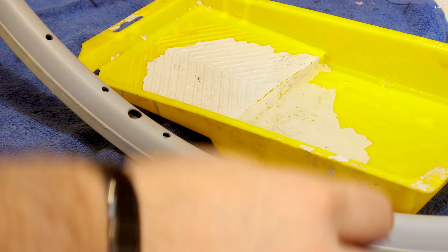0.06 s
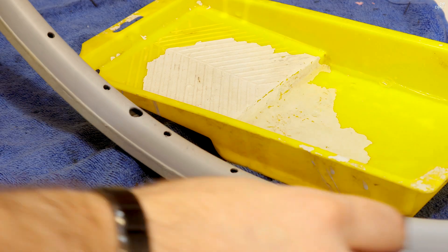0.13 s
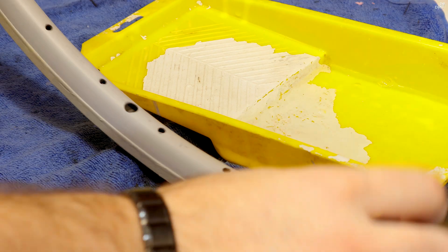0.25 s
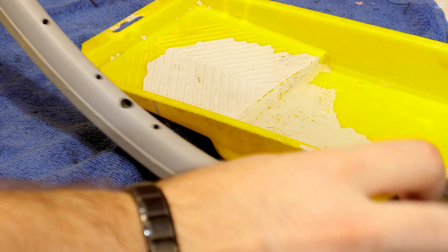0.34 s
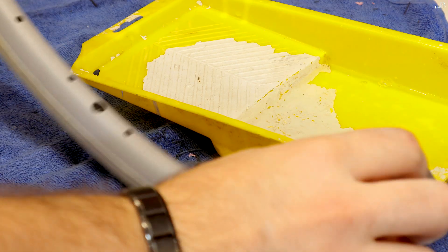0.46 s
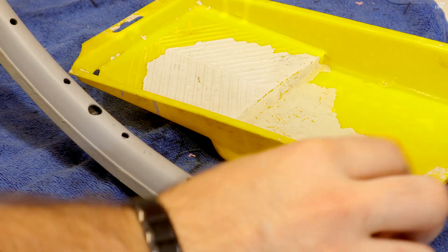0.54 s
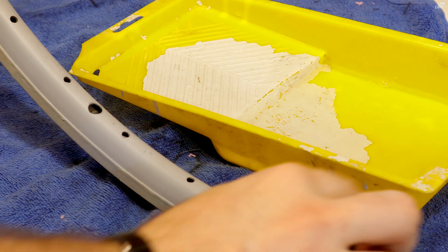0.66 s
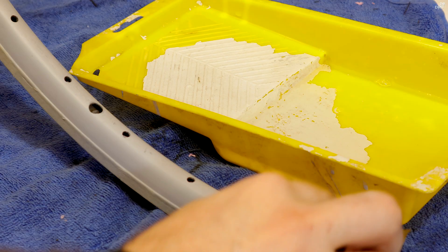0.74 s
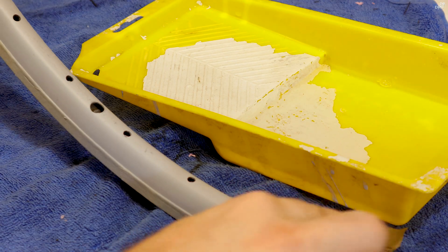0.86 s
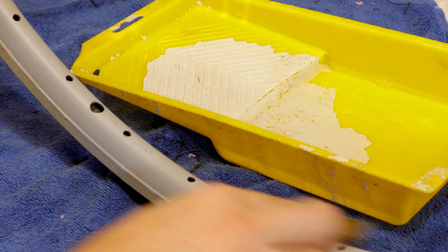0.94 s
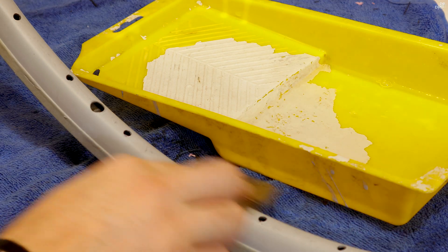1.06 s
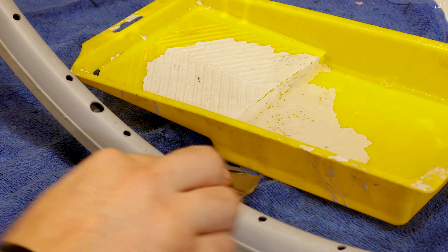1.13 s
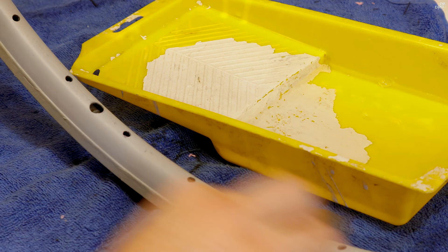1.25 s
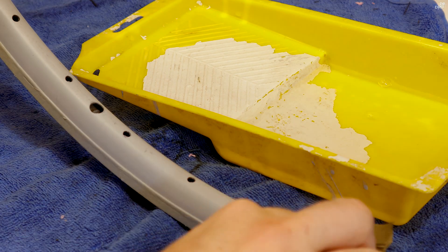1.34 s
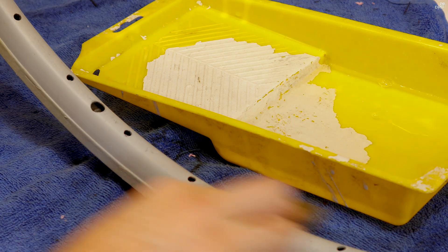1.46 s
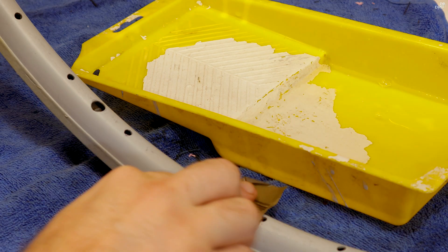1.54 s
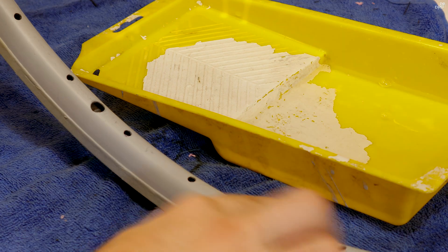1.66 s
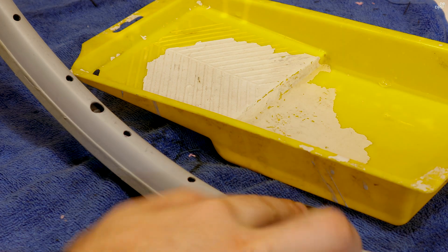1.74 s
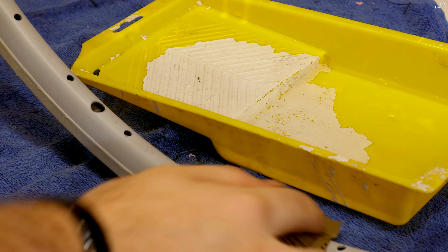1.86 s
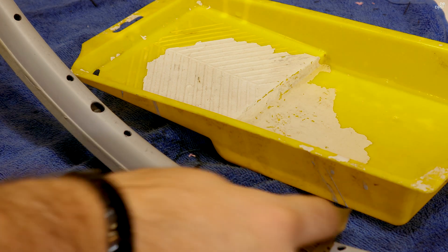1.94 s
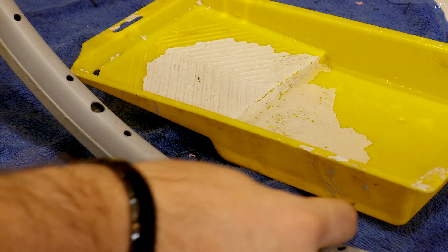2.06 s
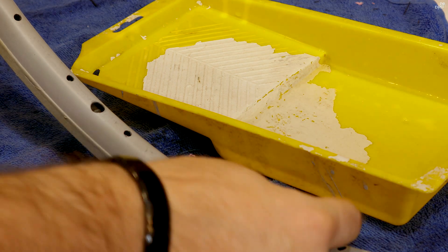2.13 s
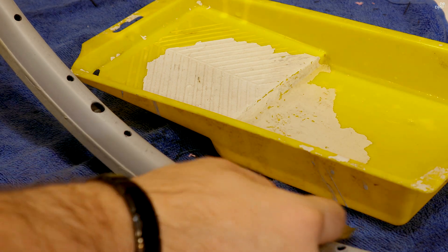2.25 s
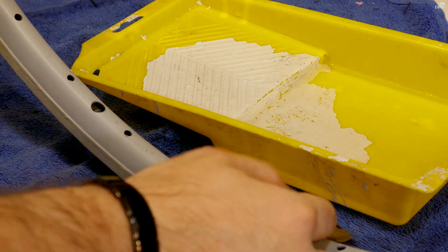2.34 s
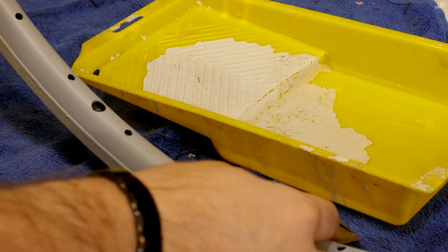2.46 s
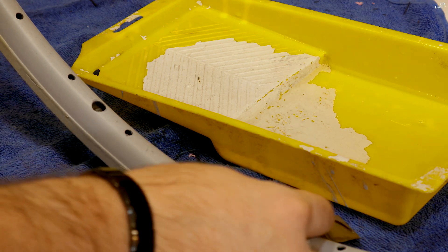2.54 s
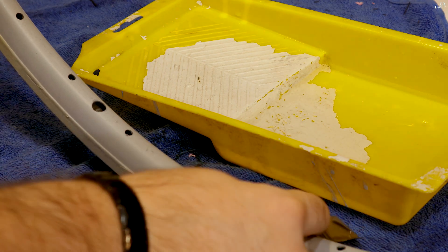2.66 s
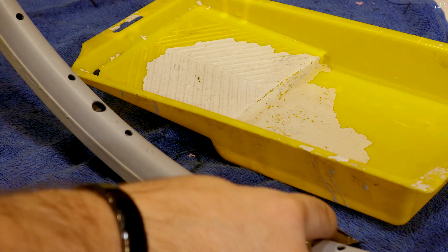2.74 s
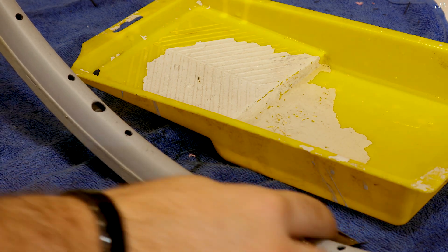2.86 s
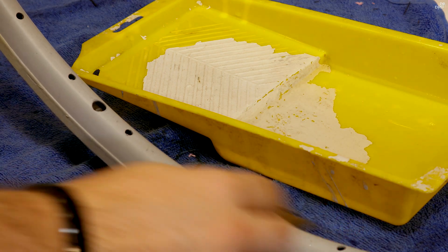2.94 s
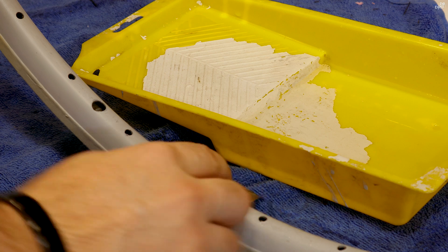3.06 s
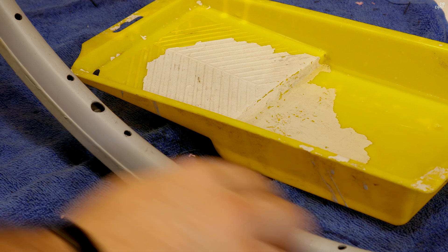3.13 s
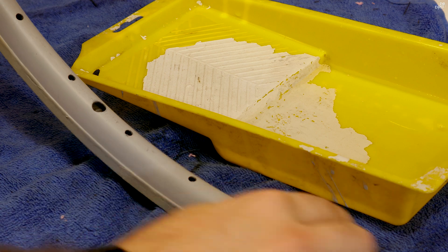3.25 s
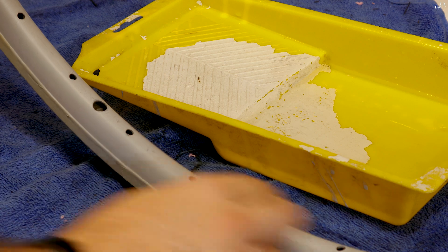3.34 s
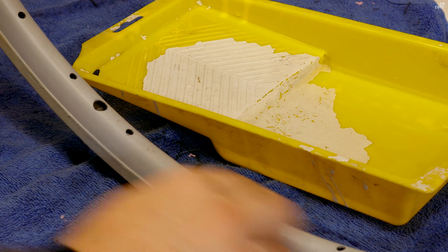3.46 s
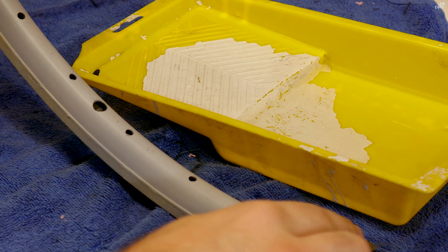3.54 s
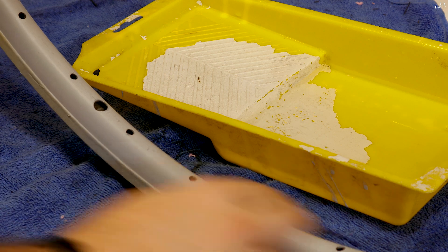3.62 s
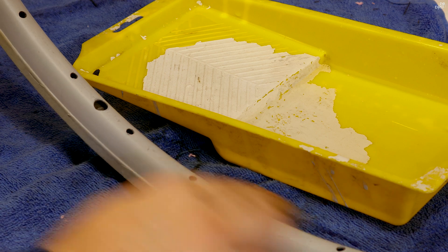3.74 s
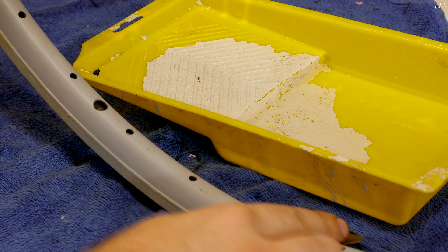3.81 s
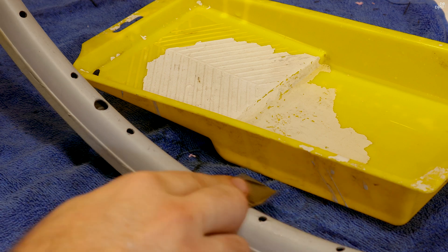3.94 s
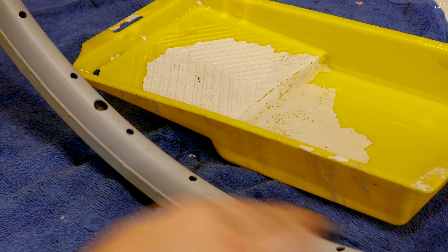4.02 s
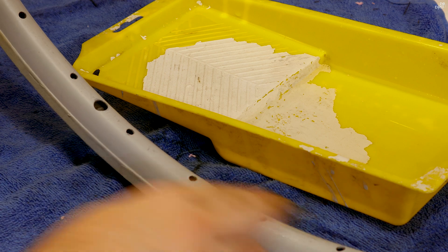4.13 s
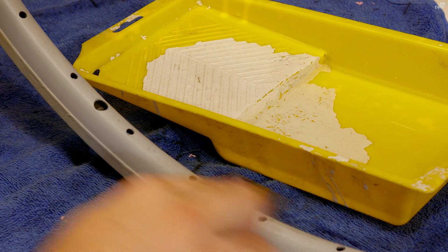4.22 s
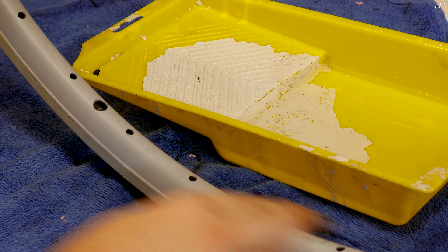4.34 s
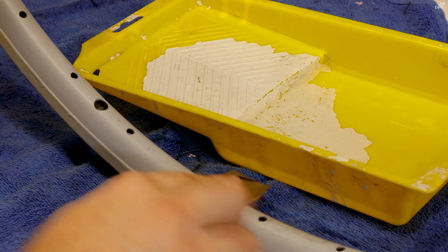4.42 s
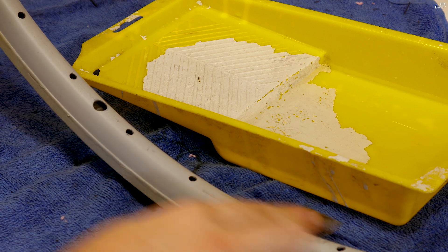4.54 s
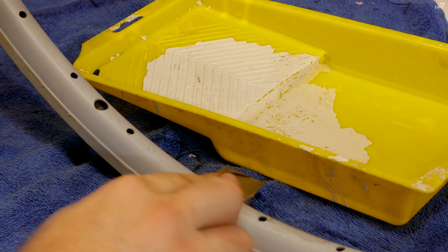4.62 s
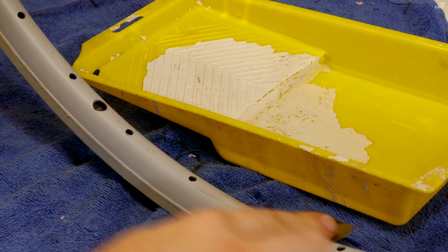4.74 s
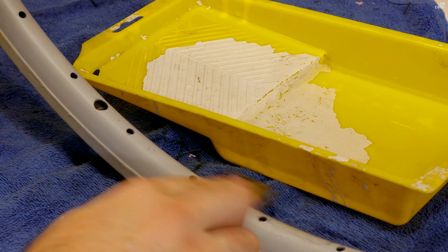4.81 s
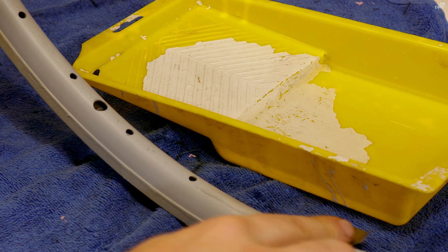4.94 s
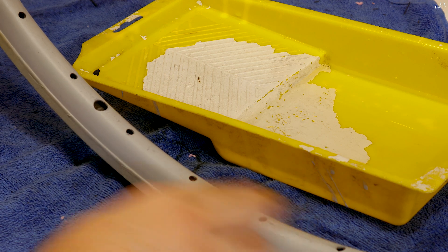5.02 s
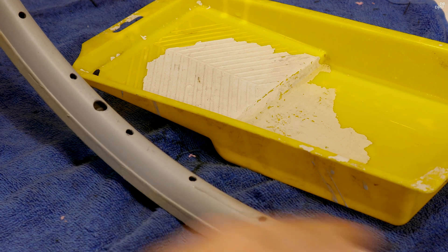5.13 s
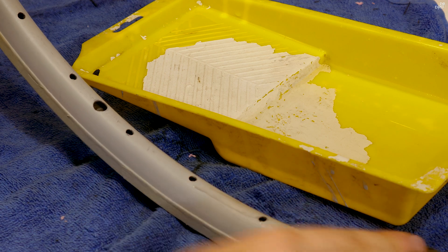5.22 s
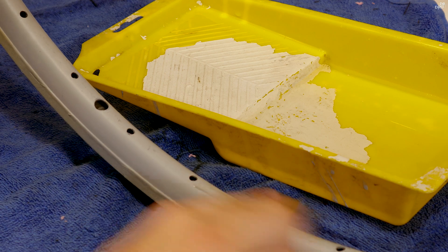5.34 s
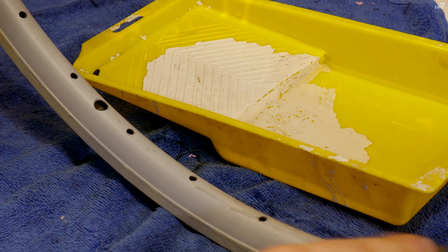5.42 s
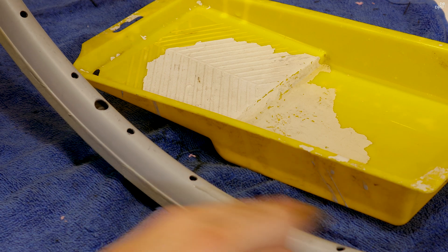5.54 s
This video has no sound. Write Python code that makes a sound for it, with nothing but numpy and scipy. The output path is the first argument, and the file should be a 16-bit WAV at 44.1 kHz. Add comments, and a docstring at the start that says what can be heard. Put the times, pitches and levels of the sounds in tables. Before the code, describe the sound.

In a quiet room, a low handling rumble comes first. Then wet sandpaper rubs a painted metal rim by hand in scattered, uneven strokes, a bright gritty hiss with small snags and faint squeaks. About halfway through it turns into fast, even back-and-forth scrubbing, the metal ringing faintly beneath. Dull bumps knock the close microphone, and it rumbles in time with the harder strokes.

```python
"""A low rumble opens the scene in a quiet room as a working arm shifts and shakes the microphone.
Then wet abrasive paper rubs a painted metal rim lying on a towel: scattered strokes, then, from about
3 s, a fast back-and-forth. Grit scratches the paint in a dense hiss and sets the rim ringing faintly;
now and then the paper snags or squeaks. Dull bumps knock the microphone's housing, and in the
vigorous scrubbing every other stroke makes it rumble."""
import sys
import numpy as np
from scipy import signal
from scipy.fft import rfft, irfft, next_fast_len
from scipy.io import wavfile
from scipy.ndimage import uniform_filter1d

SR = 44100
rng = np.random.default_rng(int(sys.argv[2]) if len(sys.argv) > 2 else 0)


def file_out(sig):
    """Save sig as 16-bit WAV at sys.argv[1]."""
    # one column per channel
    cols = np.atleast_2d(sig).T
    # limit, then scale
    lim = np.clip(cols, -1, 1)
    pcm = np.round(lim * 32767).astype(np.int16)
    wavfile.write(sys.argv[1], SR, pcm)


N = 245891
TIME = np.arange(N) / SR
HZ = np.maximum(np.fft.rfftfreq(next_fast_len(N + SR // 4, True), 1 / SR), 1)
FFT_SIZE = 2 * len(HZ) - 2
USUAL_PRESSURE_DB = -46


def from_db(db):
    """Decibels to gain."""
    return 10 ** (np.asarray(db) / 20)


def unit_rms(x):
    """Scale to an rms of 1."""
    return x / np.sqrt(np.mean(x ** 2) + 1e-20)


def eq_curve(points):
    """Gain at every frequency from a few (Hz, dB) points."""
    hz, db = np.transpose(points)
    return from_db(np.interp(np.log(HZ), np.log(hz), db))


def filtered(x, response):
    """Pass x through a frequency response."""
    return irfft(rfft(x, FFT_SIZE) * response)[:N]


def noise(response):
    """Coloured noise with an rms of 1."""
    return unit_rms(filtered(rng.standard_normal(N), response))


def decay(t60):
    """Ages and gains of a hard attack that falls 60 dB in t60 seconds."""
    age = np.arange(int(1.2 * t60 * SR) + 2) / SR
    return age, from_db(-60 * age / t60)


def place(track, time, sound):
    """Lay a short sound into a track at a time in seconds."""
    part = track[max(int(time * SR), 0):][:len(sound)]
    part += sound[:len(part)]


# Shifts of the arm that shake the microphone: (start [s], end [s], level [dB])
ARM_SHIFTS = [(-.06, 0.291, -57), (0.271, 0.643, -61), (0.764, 0.982, -56.5), (1.087, 1.313, -52.5),
              (1.228, 1.482, -53.5), (1.594, 1.678, -49.5), (1.713, 1.82, -51), (1.895, 2.023, -56),
              (2.126, 2.228, -57), (2.244, 2.429, -65.5), (2.571, 2.946, -63.5), (3.07, 3.191, -57.5),
              (3.189, 3.253, -52), (3.308, 3.4, -61.5), (3.45, 3.561, -57), (3.559, 3.732, -61.5),
              (3.773, 3.884, -53), (3.857, 3.947, -47), (4.093, 4.205, -48.5)]


def arm_shake(tremble_db=-71.5, roundness=0.555, push_db=-44.5, swell_db=13, swell_s=0.1208,
              attack_s=0.023, fall_db_per_s=394):
    """Rumble envelope: shifts swell and fade; a push builds until the arm stops, then dies away."""
    shake = np.full(N, from_db(tremble_db))
    for start, end, db in ARM_SHIFTS:
        progress = np.clip((TIME - start) / (end - start), 0, 1)
        shake = np.maximum(shake, from_db(db) * (4 * progress * (1 - progress)) ** roundness)
    for start, _ in pushes():
        age = np.maximum(TIME - start, 0)
        build_db = push_db - swell_db * np.maximum(1 - age / swell_s, 0)
        fall_db = fall_db_per_s * np.maximum(age - swell_s, 0)
        shake = np.maximum(shake, np.minimum(age / attack_s, 1) * from_db(build_db - fall_db))
    return shake


# Bass-heavy EQ of the microphone's housing: (frequency [Hz], gain [dB])
HOUSING_EQ = [(20, -30), (50, -6.5), (110, 1), (200, -1.5), (300, -6.5), (420, -11.5), (700, -16.5),
              (1200, -27), (3000, -40.5), (8000, -53)]


def handling_rumble(trim_db=-1.5, slips_per_s=3200, lumpy_db=1.4845, lumpy_hz=28):
    """Many small, dull slips of the moving arm reach the microphone through its housing."""
    slips = rng.standard_normal(N) * (rng.random(N) < slips_per_s / SR)
    rumble = unit_rms(filtered(slips, eq_curve(HOUSING_EQ)))
    lumps = noise(1 / (1 + (HZ / lumpy_hz) ** 2))
    return arm_shake() * from_db(trim_db + lumpy_db * lumps) * rumble


# EQ of the room's background: (frequency [Hz], gain [dB])
ROOM_EQ = [(20, -6), (100, -3), (250, -10), (500, -8.5), (1000, -18), (2500, -21), (7000, -21),
           (15500, -25.5)]


def room_tone(level_db=-69.5):
    """The quiet room lays a dark, steady bed under everything."""
    return from_db(level_db) * noise(eq_curve(ROOM_EQ))


# EQ of a faint stereo hiss: (frequency [Hz], gain [dB])
WIDE_HISS_EQ = [(100, -21.5), (350, 7.5), (900, 4.5), (3000, -10), (9000, -8.5), (14000, 4.5)]


def wide_hiss(level_db=-81):
    """A faint, wide hiss lies under everything."""
    return from_db(level_db) * np.array([noise(eq_curve(WIDE_HISS_EQ)) for _ in range(2)])


# Bright EQ of grit on paint: (frequency [Hz], gain [dB])
SCRATCH_EQ = [(400, -15), (800, -13), (1800, -10.5), (3200, -9), (4300, -7), (5400, -6.5), (6400, 0.5),
              (7700, -2.5), (8400, 0.5), (9700, -1.5), (11000, -8.5), (12000, -12), (13300, -19),
              (15800, -20.5)]
# Resonances of the metal rim: (frequency [Hz], width [Hz], gain re plain scratch [dB])
RIM_MODES = [(1227.8, 59.4, 3.5), (1337, 46.2, -1.5), (1476, 66, -2), (2222, 14.98, 7), (2362, 43, -9.5),
             (2505, 93, 0), (2656, 44, 5), (2835, 12, 3), (3517, 43, -2), (3895, 233, -1.5),
             (5180, 29.28, -8), (5683, 69, 0.5)]


def rim_response(echoes=8, echo_db=-20.0, spread_s=.012):
    """Scratch colour, the rim's ring and early reflections from the hand and a tray close by."""
    modes = 1 + sum(from_db(db) / (1 + 2j * (HZ - hz) / width) for hz, width, db in RIM_MODES)
    polarities = rng.choice([-1, 1], size=echoes)
    delays = (rng.uniform(.1, 1, size=echoes) * spread_s * SR).astype(int)
    paths = np.zeros(N)
    paths[0] = 1
    paths[delays] = from_db(echo_db) * polarities
    return eq_curve(SCRATCH_EQ) * modes * rfft(paths, FFT_SIZE)


def wet_film(x, patchy_db=2.0):
    """Fingers and the water film keep changing the damping, so narrow bands swell and fade."""
    bands = signal.stft(x, nperseg=512)[2]
    damping = uniform_filter1d(rng.standard_normal(bands.shape), size=5, axis=0)  # across frequency
    damping = uniform_filter1d(damping, size=14, axis=1)  # across time
    return signal.istft(bands * from_db(patchy_db * unit_rms(damping)))[1][:N]


def grit(per_s, response, rasp_hz=4700, sizzle_hz=10800):
    """Uneven grains scratch at random; returns low rasp, main hiss and top sizzle, each of rms 1."""
    sizes = from_db(2.4 * np.minimum(rng.exponential(1, N), 4)) * rng.standard_normal(N)
    bites = rng.random(N) < per_s / SR
    grains = wet_film(sizes * bites / np.sqrt(per_s))
    above_rasp, above_hiss = (1 / (1 + (hz / HZ) ** 16) for hz in (rasp_hz, sizzle_hz))
    bands = (1 - above_rasp, above_rasp - above_hiss, above_hiss)
    return [unit_rms(filtered(grains, response * band)) for band in bands]


# The paper snags or lands on the rim; rows with a negative decay are silent:
# (time [s], level [dB], rasp re hiss [dB], 60 dB decay [s])
PAPER_SNAGS = [(.33, -63.5, -5, 0.58), (.515, -63.5, 0, 1.04), (.576, -58.5, 0, 0.06),
               (.921, -56, -15, 0.23), (1.14, -45.5, -9.5, 1.05), (1.3493, -29.5, 0.5, 0.0674),
               (1.415, -43, 0.5, 0.28), (1.5249, -37, -9.5, 0.1263), (1.6, -29.5, -12.5, 0.1623),
               (1.7117, -26, -5.5, 0.0378), (2.19, -51, -12.5, 0.08), (2.583, -49.5, -24.5, 0.154),
               (2.776, -48.5, -5, .1), (3.015, -38, -12, -0.01), (3.09, -34, -32, 0.0754),
               (3.125, -26.5, -11, -0.0822), (3.229, -34.5, -4.5, 0.0551), (3.318, -34, -1.5, 0.0971),
               (3.455, -37, -6, 0.39), (3.625, -39, -8.5, 0.3234), (3.853, -41, -11.5, -0.07),
               (3.917, -38.5, 5.5, 0.06), (4.14, -36.5, -10, .2)]


def snags(scratches, trim_db=-14.0, sizzle_db=-18.0,
          release_delay_s=0.4, release_db=-36.5, release_rasp_db=-23.5, release_t60=0.0482):
    """A caught edge lets go in a burst of scratches; each push also cues one delayed release."""
    rasp, hiss, sizzle = scratches
    releases = [(start + release_delay_s, release_db, release_rasp_db, release_t60)
                for start, _ in pushes()]
    bright_gain, rasp_gain = np.zeros((2, N))
    for time, db, rasp_db, t60 in list(PAPER_SNAGS) + releases:
        burst = from_db(db + trim_db) * decay(t60)[1]
        place(bright_gain, time, burst)
        place(rasp_gain, time, from_db(rasp_db) * burst)
    return bright_gain * (hiss + from_db(sizzle_db) * sizzle) + rasp_gain * rasp


def wall_reverb(x, wet_db=-12.5, t60=0.188, dull_hz=9000):
    """The walls return a short, faint tail with a softened top."""
    envelope = decay(t60)[1]
    tail = rng.standard_normal(N)[:len(envelope)] * envelope
    response = rfft(tail, FFT_SIZE) / np.sqrt(np.sum(tail ** 2))
    return from_db(wet_db) * filtered(x, response / (1 + 1j * HZ / dull_hz))


# Knocks on the microphone's housing: (time [s], level [dB], ring [Hz], click re ring [dB])
HOUSING_BUMPS = [(.593, -37.5, 113.5, -5), (1.259, -40.5, 204.4, 4), (1.499, -50.5, 257, -15),
                 (1.743, -36.5, 203, -5.5), (2.278, -49, 225, -1.5), (3.082, -46, 171, -17.5),
                 (3.813, -36.5, 191, -29.5), (3.92, -35, 242.4, -26.5), (4.102, -34.5, 114, -35),
                 (4.164, -38.5, 224, -17), (4.463, -32, 174.6, -5), (4.676, -39, 227, -4.5),
                 (4.877, -33.5, 161, -8), (5.325, -36, 177.4, -2.5), (5.541, -32, 129.2, -9.5)]


def bumps(trim_db=2.5, ring_t60=0.0285, click_t60=0.0038, click_hz=750, lowpass_hz=1700):
    """Each bump gives a dull click and rocks the housing for a few cycles."""
    out = np.zeros(N)
    age, ring = decay(ring_t60)
    click_age, click = decay(click_t60)
    for time, db, hz, click_db in HOUSING_BUMPS:
        place(out, time, from_db(db) * ring * np.sin(2 * np.pi * hz * age))
        place(out, time, -from_db(db + click_db) * click * np.cos(2 * np.pi * click_hz * click_age))
    lowpass = signal.butter(2, lowpass_hz, fs=SR, output="sos")
    return from_db(trim_db) * signal.sosfilt(lowpass, out + 1e-18)


# The wet paper grips and sings: (midpoint [s], length [s], pitch [Hz], width [Hz], level [dB])
PAPER_SQUEAKS = [(.714, .028, 6200, 1400, -63), (1.164, .086, 5730, 150, -54),
                 (1.222, .063, 8265, 350, -48.5), (1.297, 0.097, 8255, 350, -50.5),
                 (1.364, .072, 1330, 250, -63), (1.626, 0.075, 8850, 400, -50),
                 (2.829, 0.111, 3860, 450, -58), (2.83, 0.0696, 805, 350, -59),
                 (3.041, .045, 1245, 91, -51.5), (3.033, .106, 3887, 400, -55.5),
                 (3.497, 0.0406, 2660, 150, -51), (3.631, 0.0392, 2683, 150, -52.5),
                 (5.448, 0.0462, 2487, 300, -48.5)]


def squeaks(trim_db=-3.0):
    """Uneven stick and slip feeds one narrow resonance for a moment."""
    out = np.zeros(N)
    for middle, length, hz, width, db in PAPER_SQUEAKS:
        slips = rng.standard_normal(12000)
        swell = np.hanning(int(length * SR))
        resonance = signal.butter(2, [hz - width / 2, hz + width / 2], "band", fs=SR, output="sos")
        squeak = unit_rms(signal.sosfilt(resonance, slips)[-len(swell):] * swell)
        place(out, middle - length / 2, from_db(db + trim_db) * squeak * np.sqrt(np.mean(swell ** 2)))
    return out


# Scattered strokes of the paper: (start [s], end [s], pressure [dB], pressure rise [dB], rasp [dB])
SINGLE_STROKES = [(0.735, 0.837, -60, 1, -11.5), (0.816, .91, -68, -1, -2), (0.991, 1.256, -51.5, 3.5, -10),
                  (1.258, 1.499, -49.5, 0, -6), (1.511, 1.676, -49.5, 3, -9), (1.707, 1.838, -50, -11, -6),
                  (1.926, 2.025, -63.5, 4, -5), (2.048, 2.128, -60, -2.5, -1),
                  (2.249, 2.288, -62.5, -1, -1), (2.284, 2.344, -69, -0.5, -1.5),
                  (2.372, 2.441, -62, 0.5, -4), (2.426, 2.495, -67.5, -3, -2.5),
                  (2.551, 2.726, -64.5, -5, -5), (2.775, 2.87, -54.5, 10, -3.5),
                  (2.843, 2.941, -60, -9.5, -1.5), (2.979, 3.095, -51, 7, -9.5)]


def hand(resting_touch=0.21, usual_sizzle_db=-12, sizzle_slope=0.59):
    """Speed arcs through each stroke, the paper rests lightly between, and a firm touch sizzles."""
    speed, touch = np.zeros(N), np.full(N, resting_touch)
    pressure_points, rasp_points = [], []
    strokes = [(*stroke, 0) for stroke in SINGLE_STROKES] + scrub_strokes()
    for start, end, db, rise_db, rasp_db, ease_db in strokes:
        progress = (TIME - start) / (end - start)
        inside = (progress >= 0) & (progress < 1)
        speed[inside] = np.maximum(speed[inside], np.sin(np.pi * progress[inside]))
        touch[inside] = 1
        for share, ease in ((.2, .5), (.5, -.5), (.8, .5)):  # scrubbing eases off in mid-stroke
            point_db = db + rise_db * (share - .5) + ease_db * ease
            pressure_points.append((start + share * (end - start), point_db))
        rasp_points.append(((start + end) / 2, rasp_db))
    pressure_db = np.interp(TIME, *np.transpose(sorted(pressure_points)))
    force = uniform_filter1d(touch, size=700) * from_db(pressure_db)
    sizzle_db = usual_sizzle_db + sizzle_slope * (pressure_db - USUAL_PRESSURE_DB)
    return speed, force, np.interp(TIME, *np.transpose(rasp_points)), sizzle_db


def judder(per_s=55, settle_s=0.0166):
    """The paper catches at random, biting at once and then easing: a modulator of rms 1."""
    catches = rng.uniform(0.17, 1, N) * (rng.random(N) < per_s / SR)
    bite = signal.lfilter([1], [1, -np.exp(-1 / (settle_s * SR))], catches + 1e-18)
    return unit_rms(bite - bite.mean())


def sanding(scratches, speed, force, rasp_db, sizzle_db, hiss_trim_db=-1.0, rasp_trim_db=-2.0,
            sizzle_trim_db=1.78, hiss_floor=0.053, judder_db=1.1657, rasp_judder_db=1.5847):
    """Faster paper sounds louder and brighter; the rasp lingers through the turns."""
    rasp, hiss, sizzle = scratches
    rasp_gain = from_db(rasp_db + rasp_trim_db + rasp_judder_db * judder())
    rasp = rasp * rasp_gain * (0.348 + 0.5839 * speed ** 1.318)
    hiss = hiss * from_db(hiss_trim_db) * (hiss_floor + (1 - hiss_floor) * speed ** 1.134)
    sizzle = sizzle * from_db(sizzle_db + sizzle_trim_db) * (0.03207 + 0.975 * speed ** 1.58)
    return force * from_db(judder_db * judder()) * (rasp + hiss + sizzle)


# The hand turns round in the back-and-forth: (time [s])
SCRUB_TURNS = [3.077, 3.181, 3.39, 3.55, 3.692, 3.838, 3.959, 4.09, 4.211, 4.333, 4.443, 4.556, 4.662,
               4.768, 4.872, 4.987, 5.095, 5.204, 5.352, 5.464, 5.588]
# Effort behind the back-and-forth: (time [s], pressure [dB])
SCRUB_EFFORT = [(3.13, -46.5), (3.29, -45), (3.47, -44.5), (3.62, -47), (3.78, -44.5), (4.03, -46.5),
                (4.28, -46.5), (4.55, -43.5), (5.55, -42)]


def scrub_strokes(push_extra_db=1.0, rise_db=1.5, ease_db=0.63, usual_rasp_db=-8, rasp_slope=-0.547):
    """One stroke from each turn to the next; the harder the hand presses, the less rasp in the mix."""
    strokes = []
    for start, end in zip(SCRUB_TURNS, SCRUB_TURNS[1:]):
        db = np.interp((start + end) / 2, *np.transpose(SCRUB_EFFORT))
        db += push_extra_db * ((start, end) in pushes())
        rasp_db = usual_rasp_db + rasp_slope * (db - USUAL_PRESSURE_DB)
        strokes.append((start, end, db, rise_db, rasp_db, ease_db))
    return strokes


def pushes(vigorous_from_s=4.0):
    """Once the scrubbing is vigorous, every other stroke is a push; returns their starts and ends."""
    turns = [time for time in SCRUB_TURNS if time > vigorous_from_s]
    return list(zip(turns[::2], turns[1::2]))


def scene():
    """Paper, reverb and handling noise sit in the centre over room tone and a trace of stereo hiss."""
    speed, force, rasp_db, sizzle_db = hand()
    # more grains bite when the paper moves faster and is pressed harder
    grains_per_s = 24000 * (.3 + speed) * (.1 + np.sqrt(force / force.max()))
    scratches = grit(grains_per_s, rim_response())
    paper = sanding(scratches, speed, force, rasp_db, sizzle_db) + snags(scratches) + squeaks()
    bed = room_tone() + wide_hiss()
    return paper + wall_reverb(paper) + handling_rumble() + bumps() + bed


def record(dry):
    """A steep low-pass cuts the very top of the mix."""
    cutoff_hz = 15850
    return signal.sosfilt(signal.ellip(12, .1, 80, cutoff_hz, fs=SR, output="sos"), dry)


dry = scene()
out = record(dry)
file_out(out)
```